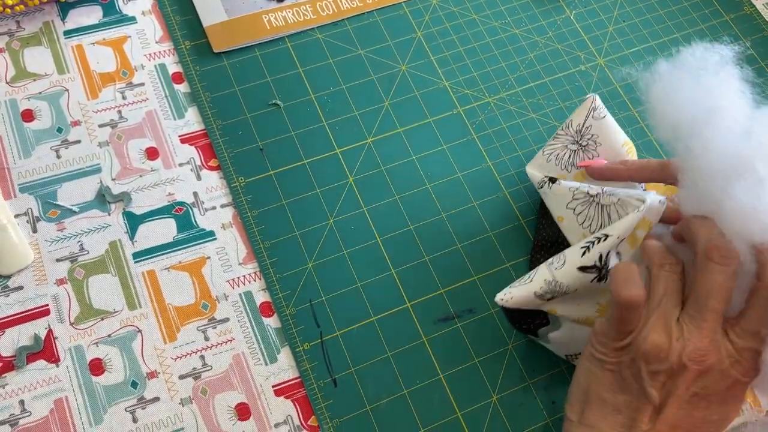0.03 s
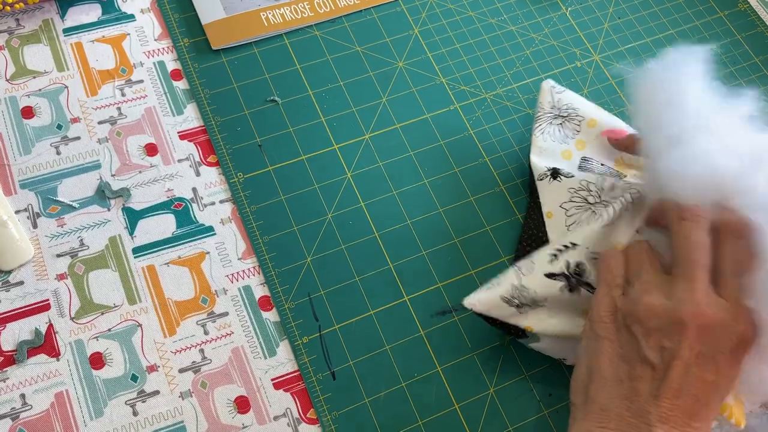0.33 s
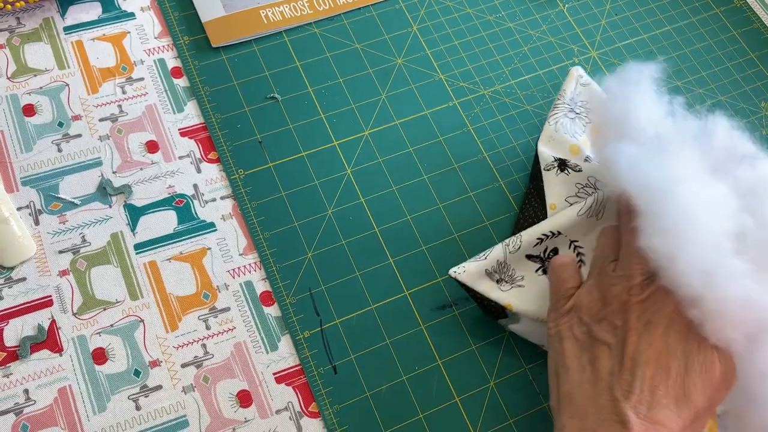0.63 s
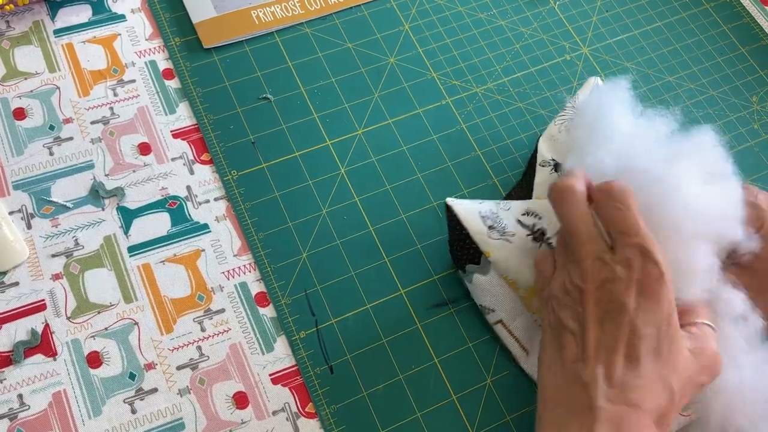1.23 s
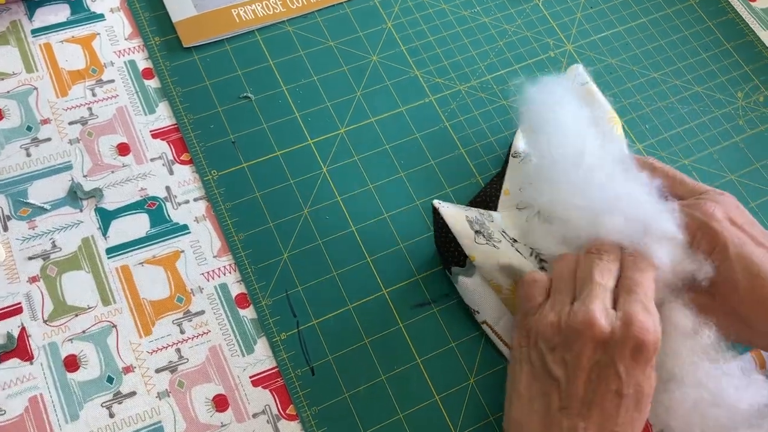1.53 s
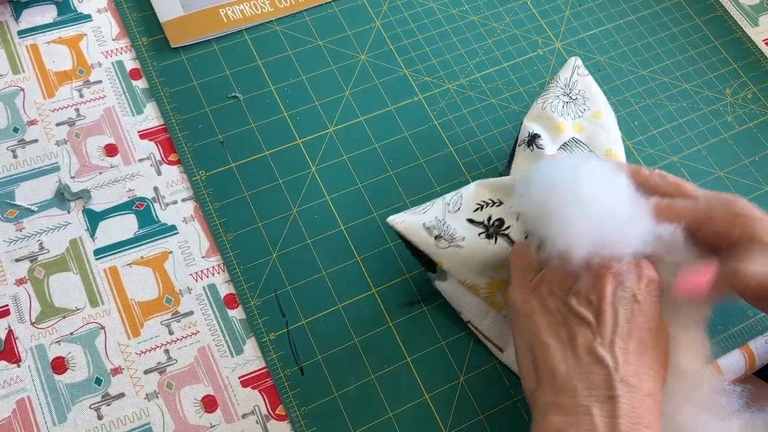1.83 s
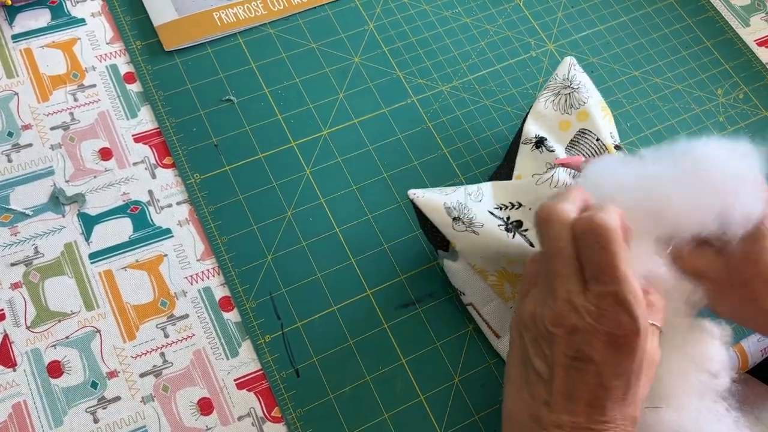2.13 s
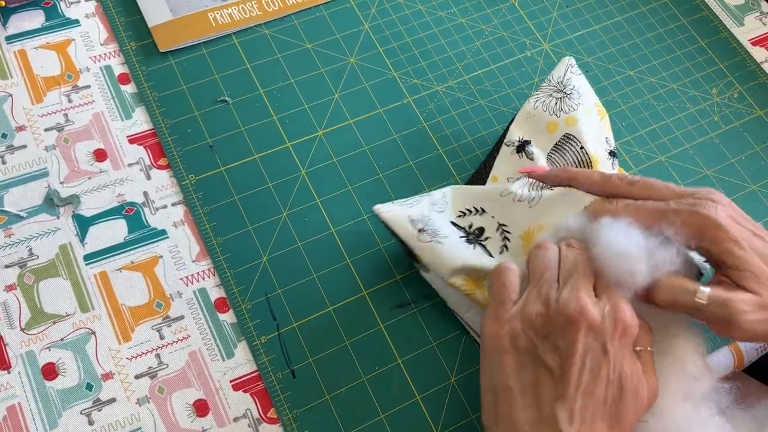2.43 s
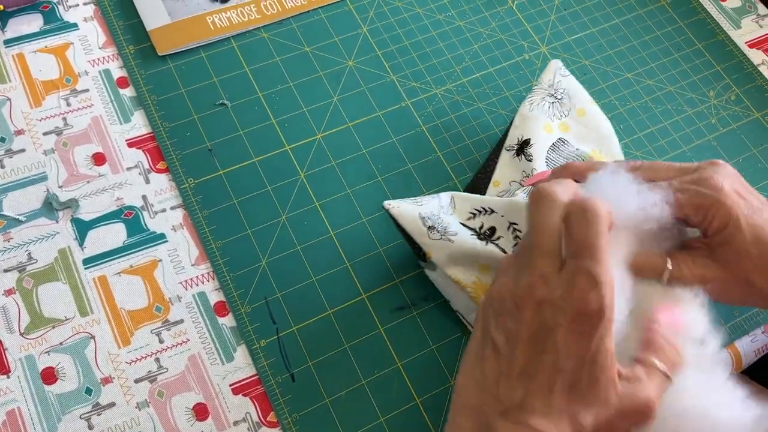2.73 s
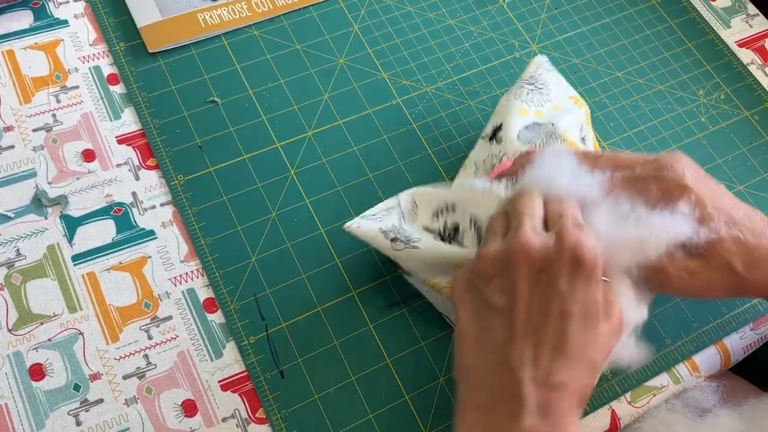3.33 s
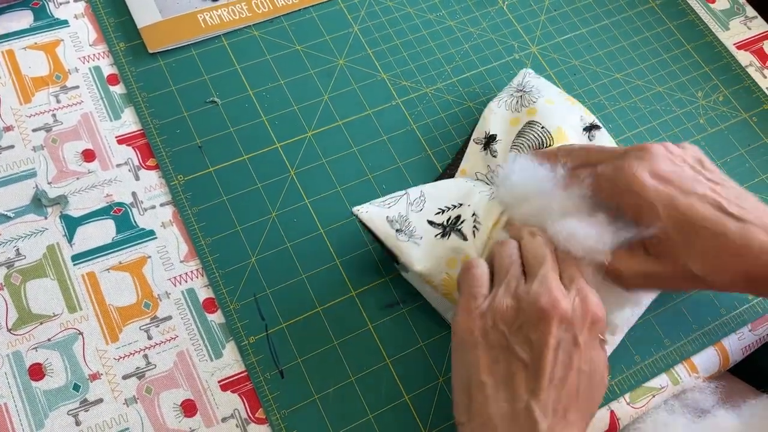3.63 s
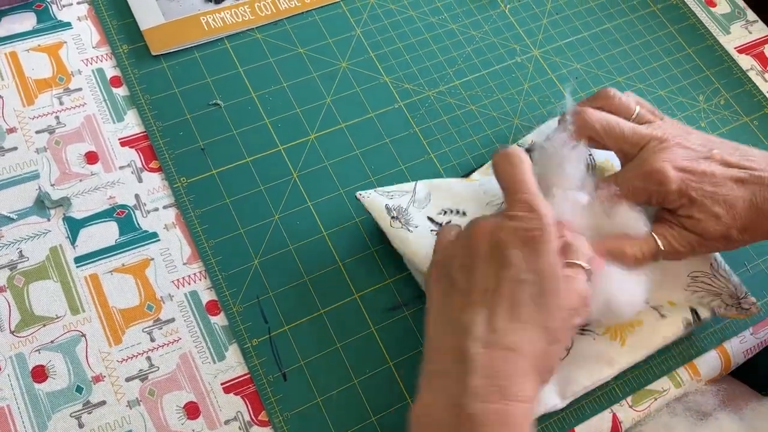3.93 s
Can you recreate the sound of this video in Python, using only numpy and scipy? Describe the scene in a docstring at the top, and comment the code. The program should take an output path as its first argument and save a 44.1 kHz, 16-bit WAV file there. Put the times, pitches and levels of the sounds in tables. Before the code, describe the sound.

Soft fibre stuffing rubs and hisses against fabric, close by, over a low hum in a quiet room. Fingers lightly bump the table and the cloth scuffs the mat; these contacts thin out midway, then crowd in at the end.

```python
"""Hands push fluffy fibre stuffing into a small cotton pillow cover on a cutting mat.
From the start a mains hum throbs over low room rumble, and fibre rubs on cloth in soft swells.
At 0.1 s a finger bumps the table and a nail ticks; both recur. From 0.5 s padded pushes thump,
the cloth scuffs the mat in small slips, and a tuft drawn over the weave sings faintly until 1.1 s.
Contacts thin out, then crowd in after 3 s; the hardest scuff comes just before the end."""
import sys
import numpy as np
from scipy import signal
from scipy.fft import rfft, irfft
from scipy.io import wavfile

SR = 44100
rng = np.random.default_rng(int(sys.argv[2]) if len(sys.argv) > 2 else 0)


def file_out(sig):
    """Save sig as 16-bit WAV at sys.argv[1]."""
    # one column per channel
    cols = np.atleast_2d(sig).T
    # limit, then scale
    lim = np.clip(cols, -1, 1)
    pcm = np.round(lim * 32767).astype(np.int16)
    wavfile.write(sys.argv[1], SR, pcm)


N = 176400
TIME_S = np.arange(N) / SR


def from_db(db):
    """Decibels to gain."""
    return 10 ** (np.asarray(db) / 20)


def unit_rms(x):
    """Scale to rms 1."""
    return x / np.sqrt(np.mean(x ** 2) + 1e-20)


def pan(left_minus_right_db):
    """Left and right gains."""
    return from_db([[left_minus_right_db / 2], [-left_minus_right_db / 2]])


def at_hz(table, hz):
    """Read a table on a log-frequency axis."""
    table_hz, values = np.transpose(table)
    return np.interp(np.log(hz), np.log(table_hz), values)


def butter(x, hz, kind, order=2):
    """Butterworth filter."""
    return signal.sosfilt(signal.butter(order, hz, kind, fs=SR, output="sos"), x + 1e-18)


def drift(corner_hz):
    """Slow random wander, rms 1."""
    hop, settle = 40, 2000
    pole = np.exp(-2 * np.pi * corner_hz * hop / SR)
    noise = rng.standard_normal(N // hop + settle + 2)
    slow = signal.lfilter([1], [1, -2 * pole, pole * pole], noise)[settle:]
    return np.interp(np.arange(N) / hop, np.arange(len(slow)), unit_rms(slow))


def grains(per_s, spread_db):
    """Random clicks of uneven size, rms 1."""
    sizes = from_db(spread_db * np.minimum(rng.exponential(1, N), 4)) * rng.choice([-1, 1], N)
    return unit_rms(sizes * (rng.random(N) < per_s / SR))


def resonant_noise(hz, width_hz):
    """Noise passed twice through one resonance, rms 1."""
    b, a = signal.iirpeak(hz, hz / width_hz, fs=SR)
    return unit_rms(signal.lfilter(b, a, signal.lfilter(b, a, rng.standard_normal(N))))


def coloured(sources, spectrum, correlation, flicker_db):
    """Flickering half-octave stereo bands, fed in turn by two mid/side pairs; mid rms 1."""
    out, edges_hz = 0, np.geomspace(22, 16500, 20)
    for k, (low, high) in enumerate(zip(edges_hz, edges_hz[1:])):
        if high < spectrum[0][0] or low > spectrum[-1][0]:
            continue
        hz = np.sqrt(low * high)
        mid, side = butter(sources[k % 2], [low, high], "band", order=3)
        alike = np.clip(at_hz(correlation, hz), -.99, .99)
        gain = from_db(at_hz(spectrum, hz) + flicker_db * drift(19.7))
        out = out + gain * (np.sqrt(1 + alike) * mid + np.sqrt(1 - alike) * side * [[1], [-1]])
    return out / np.sqrt(np.mean(out.mean(axis=0) ** 2))


def mains_hum(hz=120.05, rms_db=-50, throb_db=2, period_s=0.54, crest_s=0.39):
    """One mains tone, throbbing slowly."""
    level_db = rms_db + throb_db * np.cos(2 * np.pi * (TIME_S - crest_s) / period_s)
    return np.sqrt(2) * from_db(level_db) * np.sin(2 * np.pi * hz * TIME_S)


# Room noise spectrum (frequency [Hz], relative density [dB])
ROOM_SPECTRUM = [(25, -10.5), (45, -2), (68, 5.5), (100, 1), (145, -4.5), (190, -4), (260, -14),
                 (450, -18.5), (700, -32), (1400, -35), (2000, -42), (2800, -36.5), (6000, -51),
                 (15000, -43.5)]
# Room noise, left against right (frequency [Hz], correlation [-])
ROOM_CORRELATION = [(60, 0.85), (180, 0.86), (300, .6), (5000, 0.24), (11000, 1)]


def room_noise():
    """Low rumble and faint hiss of a quiet room."""
    air = coloured(rng.standard_normal((2, 2, N)), ROOM_SPECTRUM, ROOM_CORRELATION, flicker_db=1.6)
    rumble = resonant_noise(hz=185, width_hz=24)
    return from_db(-58) * air + from_db(-71) * rumble


# Rubbing, left against right (frequency [Hz], correlation [-])
RUB_CORRELATION = [(400, 0.22), (1500, 0.53), (3000, 0.94), (6000, 0.18), (8500, 1), (11000, 1)]


def friction(spectrum, snag_share=0.47):
    """Smooth sliding mixed with countless tiny fibre snags."""
    snags = np.array([[grains(per_s=2500, spread_db=4.5) for _ in range(2)] for _ in range(2)])
    sliding = rng.standard_normal((2, 2, N))
    sources = np.sqrt(snag_share) * snags + np.sqrt(1 - snag_share) * sliding
    return coloured(sources, spectrum, RUB_CORRELATION, flicker_db=1.5)


# Fibre rubbing on cloth (time [s], base level [dB], rustle offset [dB])
PUSHES = [(0.02, -80, 8), (0.06, -92.5, 13), (0.11, -77, 2.5), (0.16, -70.5, 0.5), (0.32, -86.5, 5.5),
          (0.43, -78.5, 6.5), (0.52, -79.5, 3), (0.54, -70, 5), (0.63, -82, 3), (0.69, -74.5, 1),
          (0.909, -67.5, 0.5), (0.95, -81.5, 1), (0.99, -81, 5), (1.12, -78.5, 3.5), (1.21, -77, 6.5),
          (1.282, -65.5, 0), (1.331, -80, -0.5), (1.38, -73.5, 2.5), (1.4, -81, -2.5), (1.49, -78, 3),
          (1.6, -84.5, -6), (1.69, -73, 1), (1.79, -75.5, 5), (1.88, -82, 6.5), (2.0, -82, -2),
          (2.06, -69, -1.5), (2.16, -85, 4.5), (2.31, -83.5, -6.5), (2.39, -75.5, 1.5), (2.54, -77.5, 3.5),
          (2.55, -85, 8), (2.63, -81.5, 2), (2.661, -72, 7), (2.71, -73.5, 2), (2.76, -78.5, 6.5),
          (2.88, -83, -2.5), (2.91, -82.5, 4), (2.93, -84.5, 1), (3.03, -75, 3), (3.05, -74, -7),
          (3.07, -66, 0), (3.09, -75, 1), (3.14, -69, 0.5), (3.2, -80, 2), (3.25, -81, -2.5),
          (3.35, -74, 6), (3.37, -72, 5), (3.38, -76.5, 4), (3.44, -77.5, 7.5), (3.53, -83.5, -1),
          (3.57, -79.5, 1.5), (3.67, -78, 2), (3.69, -70.5, -1), (3.731, -78, 4.5), (3.75, -68.5, -7),
          (3.78, -73.5, 1), (3.85, -73, 4.5), (3.9, -69, 3), (3.94, -74.5, 3), (3.99, -77.5, 6)]
# Spectra of the three rubbing layers (frequency [Hz], relative density [dB])
HISS_SPECTRUM = [(1200, -22), (2400, 1), (3500, 2.5), (5000, 1), (6500, -1), (8500, -14), (11000, -25),
                 (16000, -55)]
SHEEN_SPECTRUM = [(5000, -13), (7000, -9), (8500, -7), (10500, -2), (12500, -18), (15500, -6.5)]
RUSTLE_SPECTRUM = [(200, 3), (400, 13), (650, 6.5), (900, 1.5), (1500, 7), (2000, -2), (2800, -9),
                   (5000, -15)]


def stuffing(dull_below_db=-78, sheen_grows_above_db=-81):
    """Each push swells a fibre hiss, a fine sheen and a cloth rustle; a light touch is duller."""
    times_s, *columns = np.transpose(PUSHES)
    level_db, rustle_db = [np.interp(TIME_S, times_s, column) for column in columns]
    brightness = from_db(0.48 * np.minimum(level_db - dull_below_db, 0))
    sheen_boost_db = 0.25 * np.maximum(level_db - sheen_grows_above_db, 0)
    hiss = from_db(-1) * friction(HISS_SPECTRUM)
    sheen = from_db(sheen_boost_db - 7) * friction(SHEEN_SPECTRUM)
    rustle = from_db(rustle_db + 2.5) * friction(RUSTLE_SPECTRUM)
    return pan(0.15) * from_db(level_db) * (brightness * (hiss + sheen) + rustle)


# Tabletop modes (frequency [Hz], relative level [dB], T60 [s])
TABLE_MODES = [(633, -21, 0.057), (764, -25, 0.036), (1538, -13.5, 0.021), (2150, -31, 0.012)]


def table_response(rise_s, start_hz=2457, end_hz=481, fall_s=0.00069):
    """Soft blow on mat and table: a faint ring and a chirp, as the bending wave's highs arrive first."""
    age = np.arange(SR // 10) / SR
    chirp_hz = end_hz + (start_hz - end_hz) * np.exp(-age / fall_s)
    envelope = age / rise_s * np.exp(1 - age / rise_s)
    knock = envelope * np.sin(2 * np.pi * np.cumsum(chirp_hz) / SR)
    ring = sum(from_db(db - 60 * age / t60_s) * np.sin(2 * np.pi * hz * age)
               for hz, db, t60_s in TABLE_MODES)
    return butter(knock + ring, 2150, "low", order=10)


# Finger blows (time [s], impulse level [dB])
BUMPS = [(0.1125, -43), (.5641, -53), (0.902, -54), (1.0062, -47.5), (1.3659, -57), (1.4945, -68),
         (2.1226, -62), (2.714, -54.5), (2.906, -55), (3.047, -43.5), (3.3624, -47.5), (3.3654, -35.5),
         (3.413, -52.5), (3.7625, -55.5), (3.8552, -40.5), (3.903, -43.5)]


def finger_bumps():
    """Fingers strike the table through the cloth."""
    blows = np.zeros(N)
    for start_s, db in BUMPS:
        blows[int(start_s * SR)] += from_db(db)
    return signal.fftconvolve(blows, table_response(rise_s=0.0011))[:N]


# Nail and thread contacts (time [s], peak [dB], centre [Hz], Q [-])
TICKS = [(0.1135, -55.5, 4200, 2.7), (0.3483, -63.5, 9350, 6), (0.915, -54.5, 7200, 18),
         (1.4948, -54, 2080, 3.9), (1.7725, -56, 9000, 4.4), (2.53, -59.5, 8660, 9.3),
         (3.0473, -54, 4200, 3.4), (3.366, -57, 4480, 5.3), (3.7485, -49, 11900, 4.4),
         (3.749, -50, 5670, 6.9), (3.762, -53, 5800, 10), (3.981, -56, 7500, 2)]


def ticks(decay_s=0.0015, crack_db=-17):
    """Nails and threads tick: a tiny crack with a brief, bright ring."""
    out = np.zeros(N)
    age = np.arange(SR // 100) / SR
    for start_s, db, hz, q in TICKS:
        start = int(start_s * SR)
        crack = rng.standard_normal(len(age)) * np.exp(-age / decay_s)
        ring = signal.lfilter(*signal.iirpeak(hz, q, fs=SR), crack)
        tick = (ring + from_db(crack_db) * butter(crack, hz, "low"))[:N - start]
        out[start:start + len(tick)] += from_db(db) * tick / np.abs(tick).max()
    return out


def room_tail(x, t60_s=0.19, level_db=-12):
    """Short, dull, diffuse reverberation, different on each side."""
    age = np.arange(SR // 2) / SR
    tail = butter(rng.standard_normal((2, len(age))), 6100, "low") * from_db(-60 * age / t60_s)
    return from_db(level_db) * signal.fftconvolve(x, tail / np.linalg.norm(tail[0]), axes=1)[:, :N]


# Padded pushes (time [s], level [dB], pitch [Hz])
THUMPS = [(.531, -56, 530), (.5648, -50, 567), (0.6718, -40, 400), (.6825, -39.5, 554), (.697, -46.5, 555),
          (1.2695, -47.5, 660), (1.284, -54, 686), (2.092, -53, 338), (2.124, -58.5, 524),
          (2.773, -49, 520), (3.0485, -52, 620), (3.065, -48.5, 466), (3.3663, -50, 580), (3.389, -49, 550),
          (3.464, -51.5, 472), (3.902, -41, 504), (3.921, -48.5, 614)]


def thumps(rise_s=0.0014):
    """Cushioned blows swell and die within a few cycles."""
    out = np.zeros(N)
    for start_s, db, hz in THUMPS:
        age = np.clip(TIME_S - start_s, 0, .1)
        envelope = age / rise_s * np.exp(1 - age / rise_s)
        out += from_db(db) * envelope * np.sin(2 * np.pi * hz * age)
    return pan(-2.5) * out


# Cloth dragging on the mat (start [s], length [s], level [dB])
SCUFFS = [(0.538, 0.04, -76), (0.668, 0.041, -65), (0.83, 0.082, -67), (1.263, 0.036, -63.5),
          (1.806, 0.067, -68.5), (3.027, 0.046, -64), (3.347, 0.029, -68), (3.744, 0.043, -67.5),
          (3.858, 0.02, -54.5), (3.874, 0.06, -51.5)]


def scuffs():
    """Runs of small slips, each sounding through the table."""
    envelope = np.zeros(N)
    for start_s, length_s, db in SCUFFS:
        progress = np.clip((TIME_S - start_s) / length_s, 0, 1)
        envelope += from_db(db) * np.sqrt(2 * np.abs(np.sin(np.pi * progress)))
    slips = envelope * grains(per_s=1800, spread_db=-2.5)
    response = table_response(rise_s=0.0016)
    return pan(-2) * signal.fftconvolve(slips, response / np.linalg.norm(response))[:N]


# Long drag over the weave (time [s], lower band level [dB], upper band level [dB])
WEAVE_LEVELS = [(.55, -87, -91), (.7, -73.5, -75), (.745, -73, -101), (.8, -82, -94), (.9, -83, -88),
                (1.03, -78.5, -81), (1.1, -85, -88)]
# Its two resonances (centre [Hz], width [Hz])
WEAVE_BANDS = [(1964, 230), (2920, 180)]


def weave_drag(flutter_db=4):
    """A tuft drawn along the cloth sings in two faint, fluttering bands."""
    times_s, *columns = np.transpose(WEAVE_LEVELS)
    out = np.zeros(N)
    for column, (hz, width_hz) in zip(columns, WEAVE_BANDS):
        level_db = np.interp(TIME_S, times_s, column, left=-140, right=-140)
        out += from_db(level_db + flutter_db * drift(9)) * resonant_noise(hz, width_hz)
    return out


def scene():
    """Hands at work in the humming room."""
    background = mains_hum() + room_noise()
    contacts = finger_bumps() + ticks() + thumps() + scuffs()
    return background + stuffing() + contacts + room_tail(contacts) + weave_drag()


# Microphone balance (frequency [Hz], left minus right [dB])
PAIR_BALANCE = [(250, 1), (420, -0.5), (560, -1), (780, -2), (960, 3.5), (1950, -0.5), (2400, 1.3),
                (5800, 2), (8800, -1.5), (11000, -0.5)]
# Microphone phase (frequency [Hz], left lead [rad])
PAIR_PHASE = [(200, .1), (520, -.7), (830, .9), (1100, -.3), (1600, -.5), (2600, .4), (7800, .5), (8450, 0)]


def microphone_pair(x, treble_left_lag_s=0.000278):
    """The pair hears each pitch from a slightly different side."""
    hz = np.maximum(np.arange(N + 1) * SR / (2 * N), 1)
    above_table_hz = np.maximum(hz - PAIR_PHASE[-1][0], 0)
    lead_rad = at_hz(PAIR_PHASE, hz) - 2 * np.pi * treble_left_lag_s * above_table_hz
    left = from_db(at_hz(PAIR_BALANCE, hz) / 2) * np.exp(.5j * lead_rad)
    return irfft(rfft(x, 2 * N) * np.array([left, 1 / left]))[:, :N]


def record(dry):
    """Microphone pair, then a steep low-pass."""
    cutoff_hz = 15750
    lowpass = signal.ellip(10, .1, 70, cutoff_hz, fs=SR, output="sos")
    return signal.sosfilt(lowpass, microphone_pair(dry))


dry = scene()
out = record(dry)
file_out(out)
```